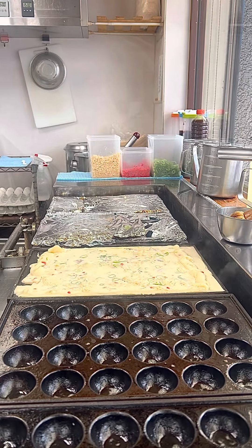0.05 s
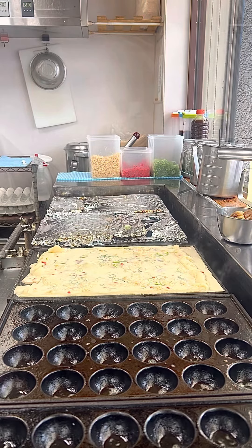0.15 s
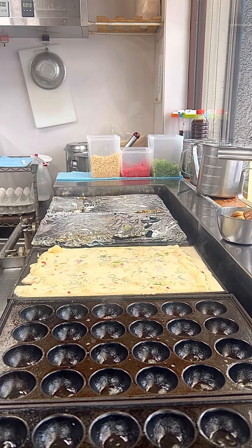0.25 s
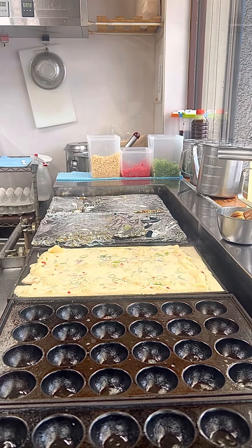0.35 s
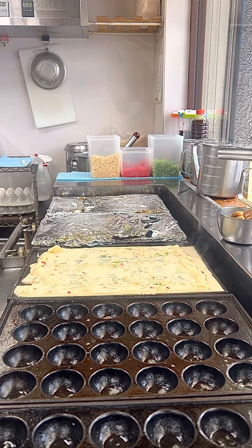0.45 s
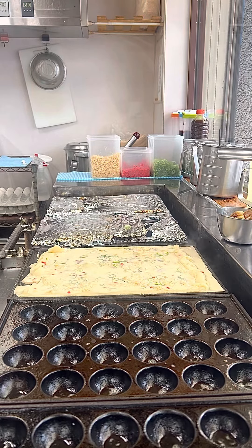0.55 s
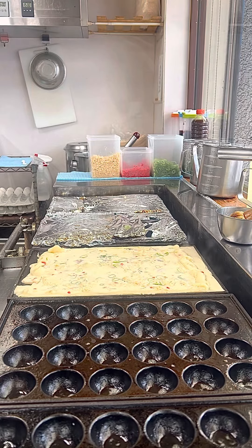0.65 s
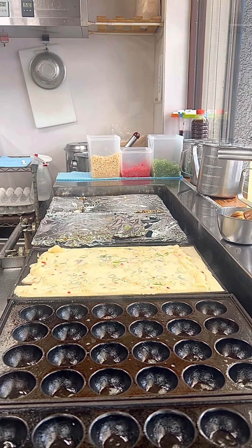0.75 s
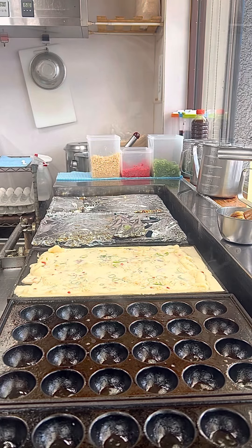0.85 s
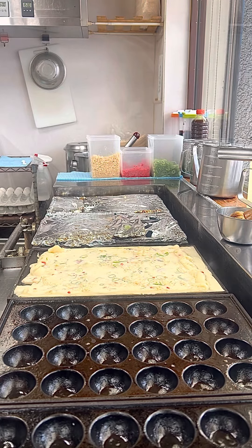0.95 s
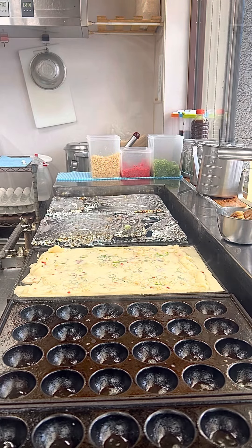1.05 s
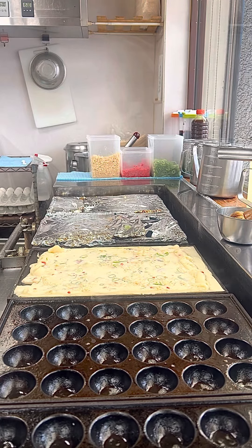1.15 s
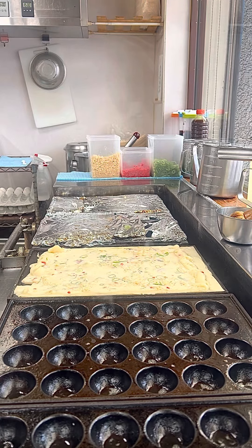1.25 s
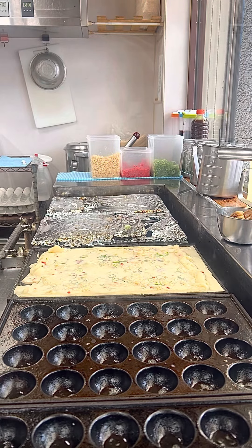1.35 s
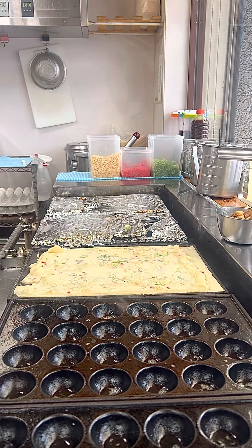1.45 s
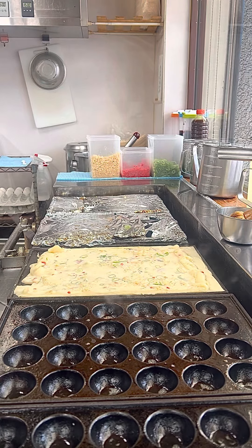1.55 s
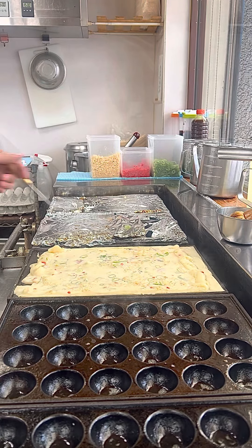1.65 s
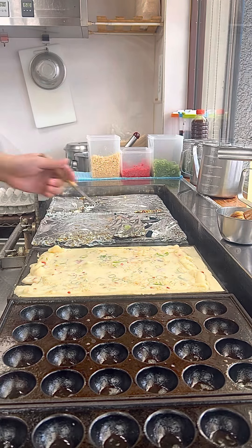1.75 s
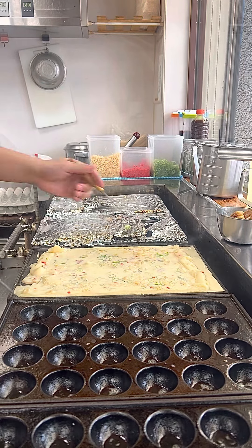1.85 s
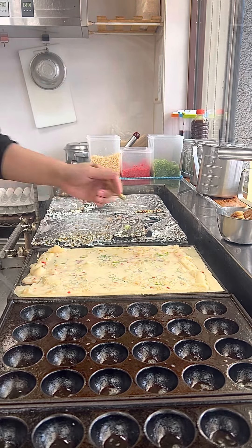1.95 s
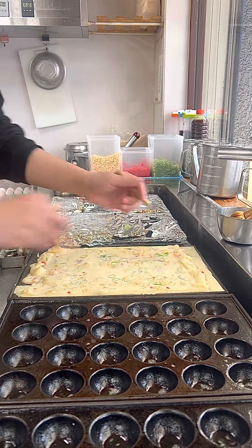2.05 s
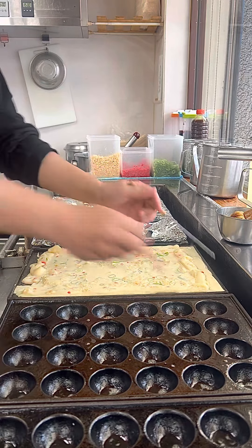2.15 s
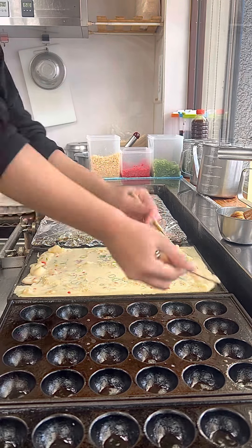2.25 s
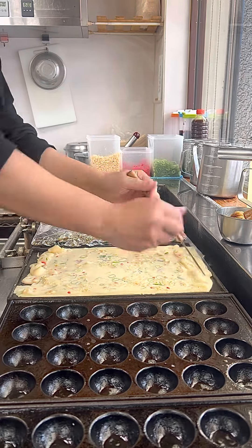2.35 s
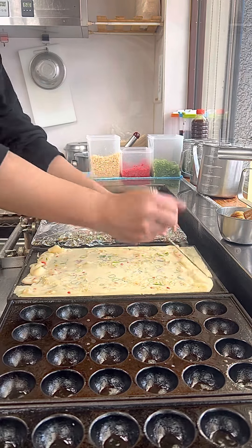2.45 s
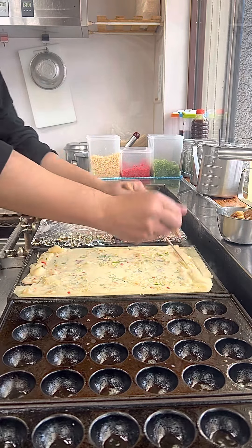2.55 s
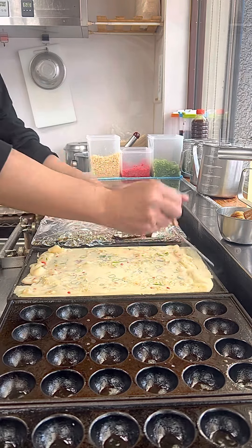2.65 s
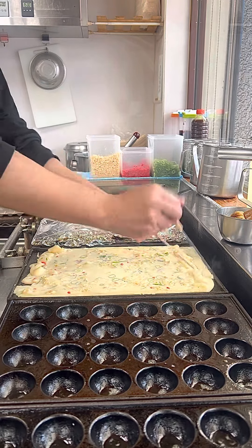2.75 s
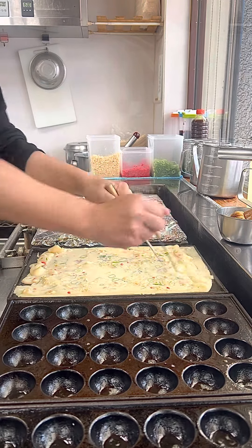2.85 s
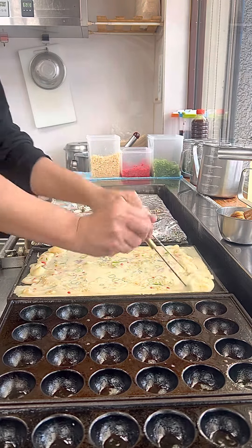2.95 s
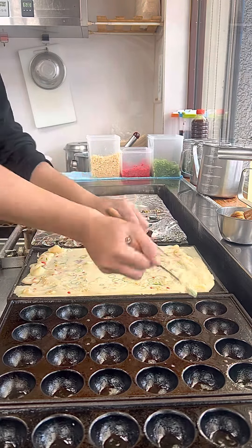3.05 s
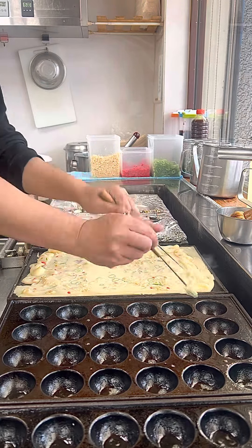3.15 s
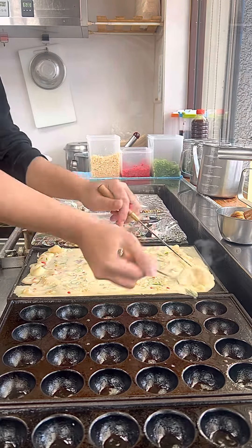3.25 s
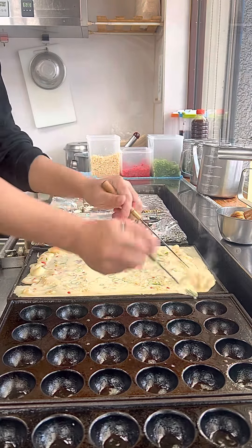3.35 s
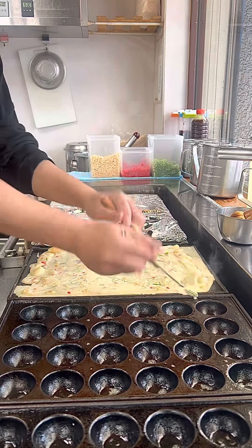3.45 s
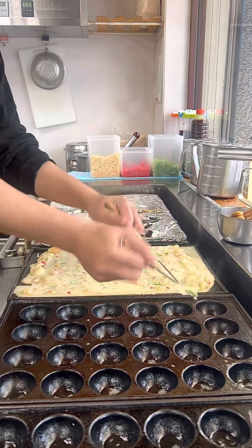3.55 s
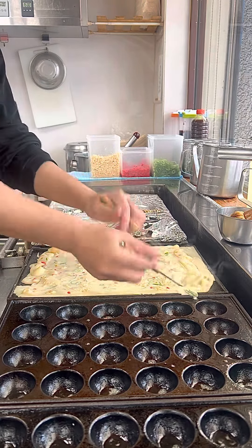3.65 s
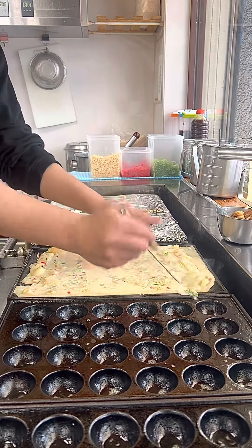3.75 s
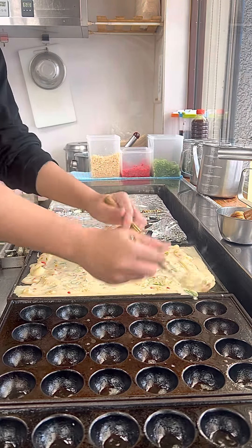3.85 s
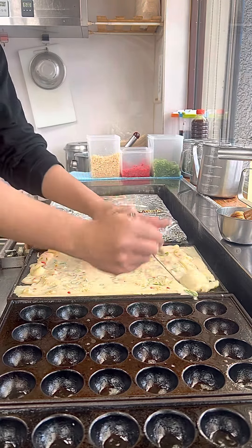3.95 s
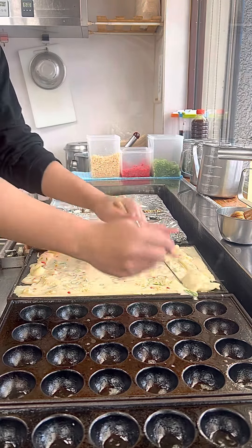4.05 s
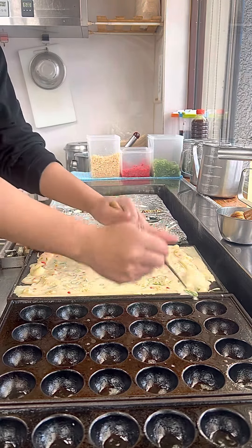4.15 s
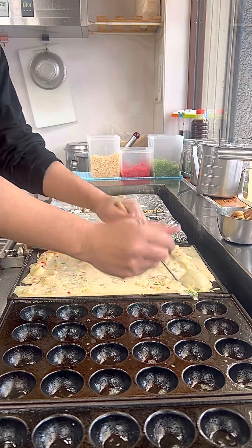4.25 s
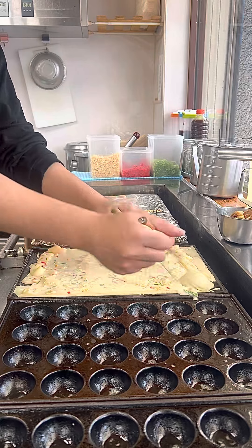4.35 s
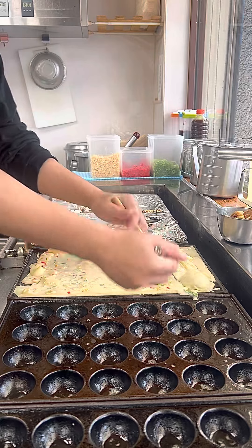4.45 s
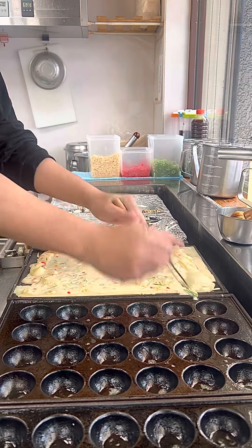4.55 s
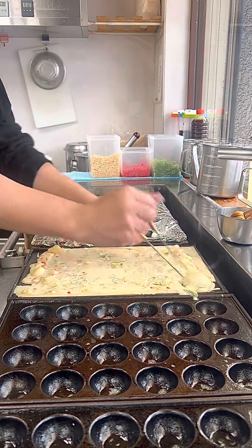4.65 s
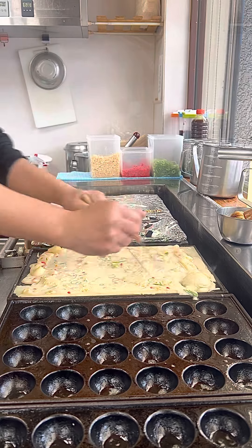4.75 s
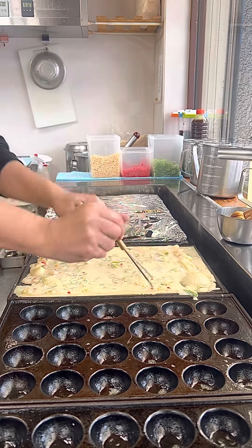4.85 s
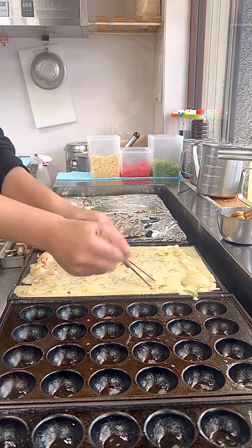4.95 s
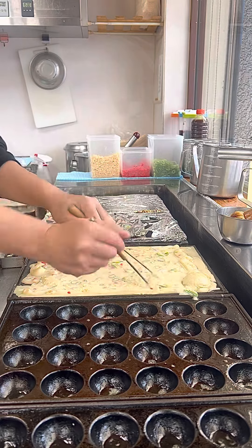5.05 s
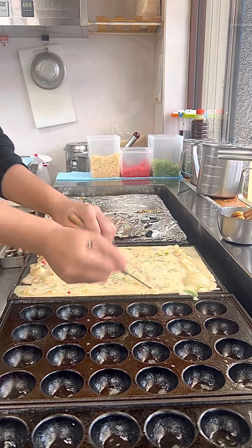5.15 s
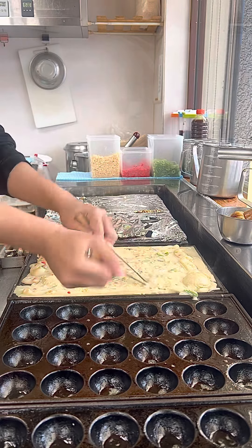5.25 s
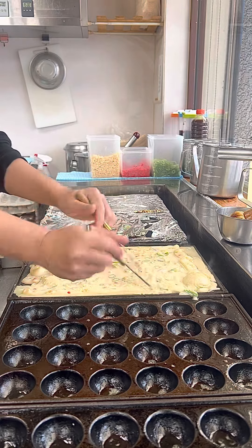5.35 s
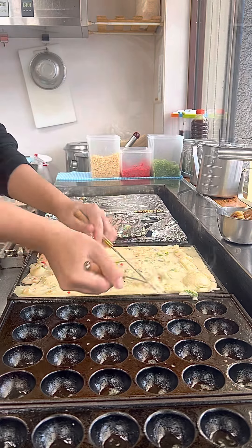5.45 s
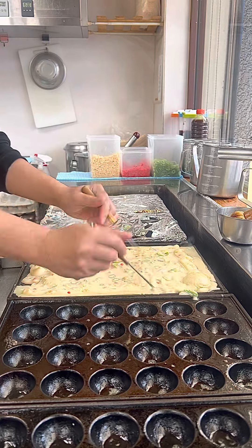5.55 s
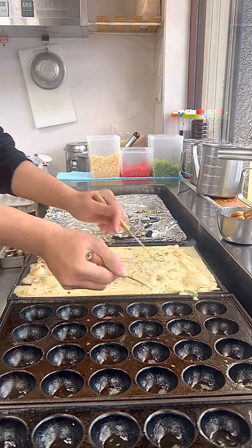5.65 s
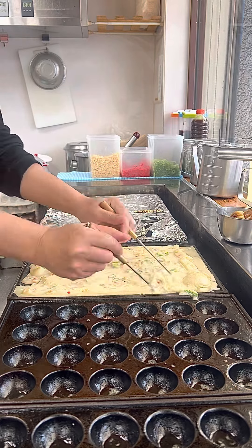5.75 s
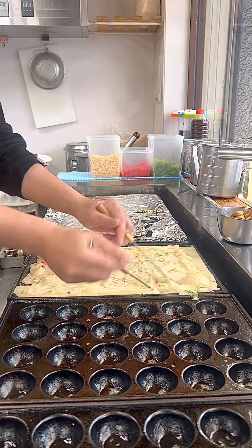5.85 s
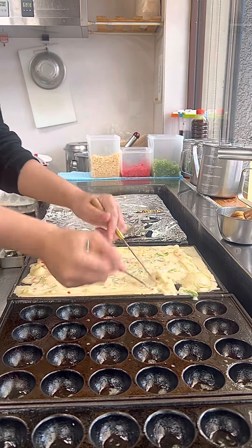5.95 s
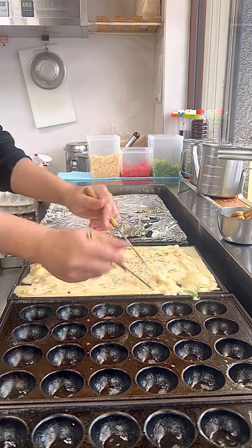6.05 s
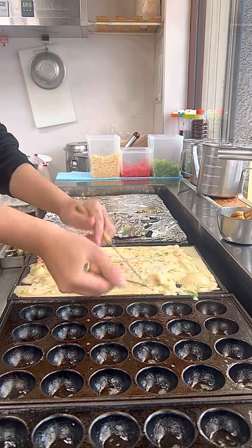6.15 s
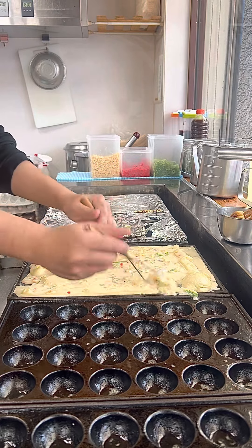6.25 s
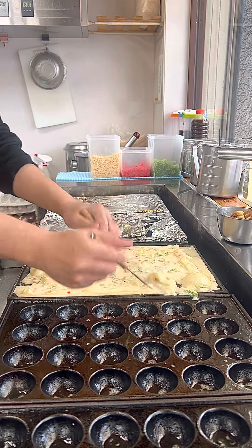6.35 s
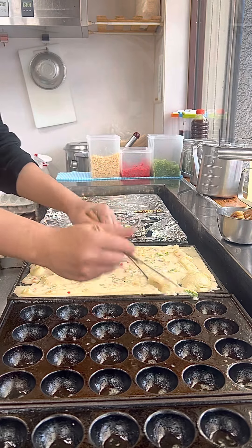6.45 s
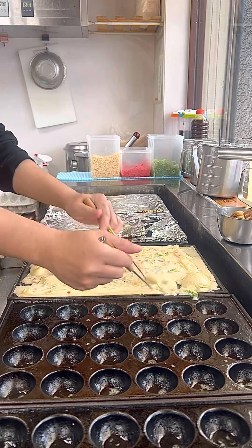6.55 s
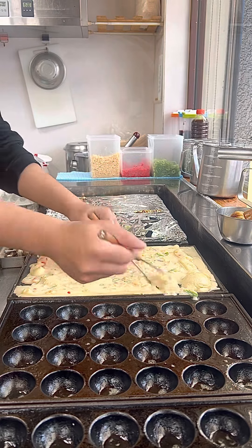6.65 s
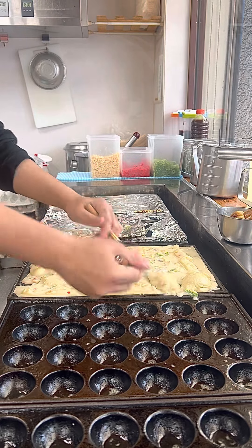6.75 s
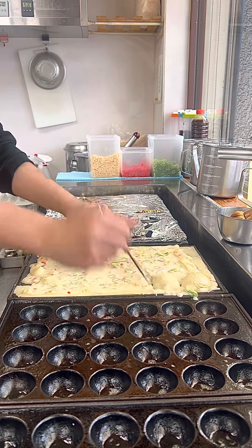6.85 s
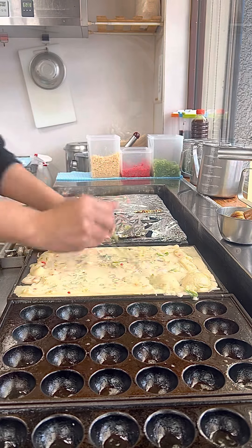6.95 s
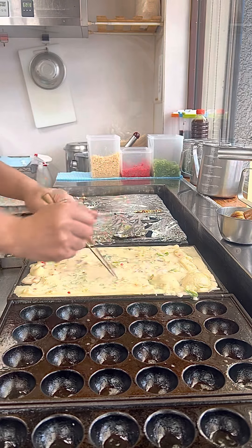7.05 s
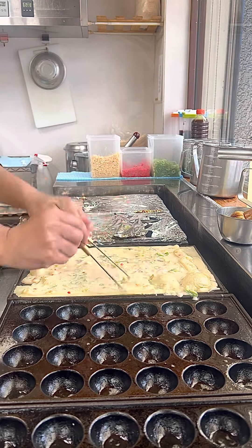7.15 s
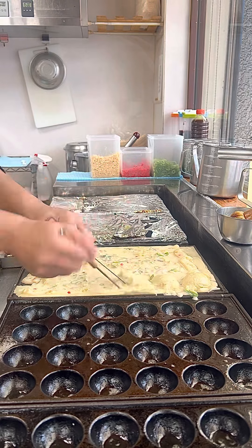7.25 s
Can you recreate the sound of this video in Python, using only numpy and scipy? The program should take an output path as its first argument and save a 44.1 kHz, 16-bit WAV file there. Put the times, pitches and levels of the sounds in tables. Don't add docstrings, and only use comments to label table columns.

```python
import sys
import numpy as np
from scipy import signal
from scipy.fft import rfft, irfft, next_fast_len
from scipy.io import wavfile
from scipy.ndimage import uniform_filter1d, map_coordinates

SR = 44100
rng = np.random.default_rng(int(sys.argv[2]) if len(sys.argv) > 2 else 0)


def master(y):
    cut = np.clip(np.atleast_2d(y).T, -1, 1)
    pcm = np.round(cut * 32767)
    wavfile.write(sys.argv[1], SR, pcm.astype(np.int16))


def level_to_linear(level):
    exponent = np.asarray(level, float) / 20
    return 10 ** exponent


N = 321930


def unit(x):
    return x / np.sqrt(np.mean(x ** 2) + 1e-20)


def along(points, hz):
    f, v = np.transpose(points)
    return np.interp(np.log(hz + 1), np.log(f + 1), v)


def curves(rows):
    s, *cols = np.transpose(rows)
    return [np.interp(np.arange(N) / SR, s, c) for c in cols]


def filtered(x, response):
    n = x.shape[-1]
    m = next_fast_len(n + 4096)
    return irfft(rfft(x, m) * response(np.fft.rfftfreq(m, 1 / SR)), m)[..., :n]


def modes(table, f):
    return sum((-1) ** k * level_to_linear(db) * 1j * f * w / (c * c - f * f + 1j * f * w)
               for k, (c, w, db) in enumerate(table))


def noise(patchy_db):
    z = signal.stft(rng.standard_normal((2, N)), nperseg=512)[2]
    field = uniform_filter1d(rng.standard_normal(z.shape[1:]), size=8, axis=0)
    field = uniform_filter1d(field, size=10, axis=1)
    return signal.istft(z * level_to_linear(patchy_db * unit(field)), nperseg=512)[1][:, :N]


def grains(count, spread_db):
    at = rng.integers(0, N, count)
    size = level_to_linear(spread_db * np.minimum(rng.exponential(size=count), 4.5))
    return np.array([np.bincount(at, size * rng.standard_normal(count), N) for _ in range(2)])


def add(track, s, piece):
    i = round(s * SR)
    track[:, i:i + piece.shape[1]] += piece[:, :max(N - i, 0)]


def swells(rows):
    t = np.arange(0, N / SR + .002, .002)
    s, db, rise, fall = np.transpose(rows)[:, :, None]
    before, after = (s - t) / np.maximum(rise, .005), (t - s) / np.maximum(fall, .005)
    far = np.where(t < s, before, after)
    gain = level_to_linear(db - 20 * far ** 1.5).sum(axis=0)
    return np.interp(np.arange(N) / SR, t, gain)


def draught_db():
    # (time [s], strength [dB])
    strength = [(0.0, -50.5), (0.75, -49.5), (1.93, -49), (2.09, -48), (3.64, -44.5), (3.82, -41.5),
                (4.49, -45.5), (5.96, -39.5), (6.24, -40), (7.3, -37)]
    return curves(strength)[0] + 46


def drone():
    # (time [s], pitch [Hz], level [dB])
    note_path = [(0.0, 50.8, -54), (0.12, 49.4, -27), (0.28, 45.5, -33.5), (0.57, 58.47, -35.5),
                 (1.67, 56.9, -30), (1.81, 70.4, -33), (2.05, 67.5, -28), (2.32, 45.9, -21.5),
                 (2.82, 49.65, -14), (2.88, 46.46, -16.5), (3.66, 46.7, -21.5), (3.84, 48.7, -16.5),
                 (5.35, 45.92, -15), (5.57, 59.78, -15.5), (6.49, 61.9, -15.5), (6.65, 56.83, -19.5),
                 (7.14, 56.47, -19.5), (7.3, 44.74, -12)]
    # (time [s], depth [dB])
    dips = [(1.93, 16), (2.17, 32), (2.42, 10), (2.514, 3), (2.614, 11), (2.873, 1), (3.133, 16),
            (3.302, 18), (3.427, 16), (3.512, 1), (3.577, 14), (3.682, 14), (3.971, 18), (4.26, 14.5),
            (4.37, 6), (4.48, 4.5), (4.545, 6), (4.634, 4), (4.719, 9), (4.839, 9), (4.944, -1),
            (5.138, 11), (5.298, 8), (5.422, 25), (5.677, 9), (5.752, 11), (5.956, 11), (6.366, 7),
            (6.54, 6.5), (6.595, 11), (6.685, 17), (6.824, 17), (6.964, 30), (7.094, 17)]
    dip_s = .024
    hz, db = curves(note_path)
    t = np.arange(N) / SR
    db = db + 1.5 - sum(depth_db * np.exp(-((t - s) / dip_s) ** 2) for s, depth_db in dips)
    note = np.sqrt(2) * np.sin(2 * np.pi * np.cumsum(hz) / SR)
    blur = unit(filtered(rng.standard_normal(N), lambda f: modes([(50.3, 32, 0)], f) ** 3))
    return level_to_linear(db) * (0.8 * note + 0.24 * blur) * [[1], [0]]


def roar():
    # (frequency [Hz], density [dB per Hz])
    flame = [(33, -33), (42, -3), (70, 2.5), (130, -5.5), (250, -12.5), (500, -21), (690, -22),
             (790, -26.5), (900, -24.5), (1200, -31), (1800, -37.5), (2200, -47.5), (3500, -46.5),
             (6000, -120)]
    # (frequency [Hz], width [Hz], level [dB])
    shaken_modes = [(150, 1.4, -10.5), (212.6, 6.4, -12), (295.4, 4.9, -8), (330.8, 6.1, -7),
                    (489, 6.7, -13.5), (616, 70, -26), (970, 7.5, -25)]
    # (level at the mean draught [dB], growth [dB per dB of draught])
    regions = [
        (-29, 0.71),
        (-37.5, 1),
        (-44, 0.94),
    ]
    # (time [s], strength [dB], rise [s], fall [s])
    shakes = [(1.83, -20, 0.044, 0.083), (2.01, -22, 0.049, 0.042), (2.24, -28.5, 0.048, 0.11),
              (2.52, -29.5, 0.086, 0.15), (2.75, -27, 0.24, 0.33), (3.92, -33, 0.29, 1),
              (4.78, -25.5, 0.13, 0.023), (4.95, -35, 0.03, 0.17), (6.2, -43, 0.14, 0.62),
              (7.2, -35, 0.022, 0.32)]
    both = filtered(noise(patchy_db=1.0),
                    lambda f: level_to_linear(along(flame, f)) + level_to_linear(3.5) * np.abs(modes(shaken_modes, f)))
    low = lambda f, edge_hz: 1 / (1 + (f / edge_hz) ** 6)
    parts = [lambda f: low(f, 272), lambda f: low(f, 844) - low(f, 305), lambda f: 1 - low(f, 798)]
    shake, strength_db = swells(shakes), draught_db()
    extra = [shake, level_to_linear(-15.5) * shake, 0]
    return sum((level_to_linear(db + grows * strength_db) + more) * unit(filtered(both, part))
               for (db, grows), more, part in zip(regions, extra, parts))


def counter():
    # (time [s], peak [dB], rise [s], fall [s])
    sing_high = [(.52, -40, 0.21, 0.3), (2.24, -29.5, 0.091, 0.15), (2.8, -25.5, 0.44, 0.14),
                 (4.0, -41.5, 0.095, 0.93), (4.55, -28, 0.22, 0.064), (6.199, -29, 0.097, 0.19),
                 (6.999, -28.5, 0.69, 0.21)]
    # (time [s], peak [dB], rise [s], fall [s])
    sing_low = [(1.299, -38, 0.41, 0.67), (1.85, -44, 0.057, .3), (3.3, -29, 0.84, 0.53),
                (4.0, -47.5, 0.64, 1), (4.92, -21.5, 0.48, 0.14), (7.18, -20, 0.29, 0.12)]
    rest_db = -40.5, -37.5

    def ring(hz, width):
        return unit(filtered(rng.standard_normal((2, N)), lambda f: modes([(hz, width, 0)], f) ** 2))

    high, low = (level_to_linear(db + 0.64 * draught_db()) + swells(rows)
                 for db, rows in zip(rest_db, (sing_high, sing_low)))
    return high * ring(206.6, 12.7) + low * ring(95.66, 5.4)


def hood():
    # (frequency [Hz], width [Hz], level [dB])
    whistles = [(2377, 110, 1), (3240, 150, 7), (4870, 160, -15)]
    air = rng.standard_normal((2, N))
    return level_to_linear(-56.0) * unit(filtered(air, lambda f: np.abs(modes(whistles, f)) ** 1.44))


def sizzle():
    # (time [s], level [dB])
    heat = [(0.0, -49), (0.69, -51), (1.81, -49), (2.15, -33.5), (2.27, -44.5), (2.5, -47), (2.68, -47),
            (3.05, -45.5), (4.21, -41.5), (4.55, -45), (4.86, -44.5), (5.02, -41.5), (6.28, -36.5),
            (7.3, -36)]
    # (frequency [Hz], density [dB per Hz])
    fizz = [(1200, -49), (2000, -19.5), (2500, 0), (3300, -1.5), (4000, 1.5), (4800, 3), (6200, -1.5),
            (8300, -3), (12000, 3.5), (16000, -4)]
    # (frequency [Hz], width [Hz], level [dB])
    whistle_peak = [(5100, 130, -1.5)]
    spray = unit(noise(patchy_db=2.2)) + .3 * unit(grains(count=9000, spread_db=3))
    spit_db, spit_t60 = -14, 0.044
    fade = level_to_linear(-60 * np.arange(SR // 20) / SR / spit_t60)
    puffs = signal.fftconvolve(np.abs(grains(count=260, spread_db=1)[0]), fade)[:N]
    spray = spray + level_to_linear(spit_db) * unit(puffs * rng.standard_normal((2, N)))
    colour = lambda f: level_to_linear(along(fizz, f)) * (1 + np.abs(modes(whistle_peak, f)))
    return level_to_linear(curves(heat)[0] + 0.4) * unit(filtered(spray, colour))


def squeals():
    # (time [s], length [s], pitch [Hz], glide [Hz], level [dB])
    slips = [(0.138, .06, 8400, 0, -53), (.28, .09, 546, 88, -37), (1.348, 0.028, 6920, 100, -29),
             (1.96, .1, 1715, -20, -50), (1.965, 0.11, 4300, 2, -48), (1.992, 0.101, 6250, -100, -39.5),
             (2.003, 0.082, 8400, 147, -35), (2.011, .13, 655, 8.5, -34), (2.017, .055, 3200, -2, -46.5),
             (2.049, .08, 1630, 0, -54), (2.079, 0.073, 7840, -300, -43), (2.085, .05, 9170, -500, -32),
             (2.137, .06, 1670, -30, -51), (2.177, .035, 8100, -100, -47), (2.18, .1, 1616, 40, -52),
             (2.234, 0.053, 8900, 2, -44), (2.238, .05, 7200, 0, -48), (2.242, 0.047, 4730, 102, -41),
             (2.442, 0.0793, 1620, 90, -51), (2.58, 0.077, 686, -30, -38), (2.57, .09, 1670, 20, -51),
             (2.708, 0.102, 1600, 133, -47), (2.758, 0.062, 700, -84, -34), (2.864, .035, 8750, 0, -44),
             (4.691, 0.072, 1704, 0, -49), (4.79, .035, 7150, 100, -38.5), (4.793, 0.032, 4240, 4, -41),
             (7.151, 0.11, 628, -36, -31.5)]
    blur = .045
    out, t = np.zeros((2, N)), np.arange(SR // 5) / SR
    for s, length, hz, glide_hz, db in slips:
        u = np.clip(t / max(length, .01), 0, 1)
        flicker = [map_coordinates(rng.standard_normal(200), [2 + t * blur * hz]) for _ in range(2)]
        tone = np.sin(2 * np.pi * np.cumsum(hz + glide_hz * u) / SR)
        tone = tone * np.sqrt(np.abs(np.sin(np.pi * u)))
        add(out, s, level_to_linear(db + 3.5) * tone * ([[.5], [0]] + np.array(flicker)) * (u < 1))
    return out


def iron(f):
    # (frequency [Hz], density [dB per Hz])
    rasp = [(1200, -49), (2000, -8.5), (3000, 2), (4800, -3), (6200, -4), (8300, -8), (12000, 11),
            (16000, -21.5)]
    # (frequency [Hz], width [Hz], level [dB])
    pan_modes = [(3200, 200, -28), (4060, 67, 4.5), (4990, 15, 4), (6060, 110, -10), (7050, 14, 5),
                 (8380, 37, -30), (7900, 650, 4), (8400, 150, -37)]
    return level_to_linear(along(rasp, f)) * (1 + 0.56 * np.abs(modes(pan_modes, f)))


def taps():
    # (time [s], peak [dB], ring of the spot [Hz], ring of the pick [Hz], dullness [dB])
    sharp_ticks = [(1.1264, -47, 3240, 7590, -11), (1.7182, -40, 3200, 7950, -11),
                   (1.869, -36, 3380, 7800, -6), (2.1849, -28.5, 4240, 8000, -5), (2.24, -31, 4740, 7240, -1),
                   (2.4767, -42, 3220, 8300, -3), (2.7209, -25.5, 4000, 8140, -11),
                   (3.8452, -18.5, 4760, 7500, -8.5), (4.049, -24.5, 3240, 8360, -12),
                   (4.0849, -22.5, 4500, 8800, -13.5), (4.143, -31, 3240, 8530, -16),
                   (5.3946, -26, 4760, 7200, -18), (5.424, -14.5, 4980, 8400, -12),
                   (5.5387, -26, 3470, 7290, -9), (5.6206, -30, 4770, 7600, -9),
                   (6.14, -19.5, 3630, 6400, -18), (6.1988, -33, 5050, 8350, -22),
                   (6.3809, -24.5, 2750, 7700, -14), (6.5931, -26.5, 4340, 6270, -14),
                   (6.7316, -30, 5010, 6970, -7), (6.7378, -23.5, 4770, 6930, -18),
                   (6.7979, -17.5, 3200, 8150, -14), (7.2842, -25.5, 4000, 8500, -17)]
    more_taps = [(2.6, -23.5, 5100, 8100, -11), (2.7167, -25, 2940, 8250, -13.5),
                 (3.0675, -28.5, 3280, 8040, -18), (3.462, -22.5, 4250, 8250, -11),
                 (3.4733, -30, 5100, 8400, -7), (4.5257, -19.5, 4150, 8700, -13),
                 (4.6999, -22, 5880, 8087, -9), (5.1986, -22, 4980, 8726, -24),
                 (6.3102, -22, 4955, 7665, -21), (6.6298, -23.5, 4500, 8250, -11),
                 (7.0846, -26, 5100, 8520, -8), (7.163, -29, 5240, 7900, -11)]
    skids = [(1.7806, -34, 3150, 6360, -3), (1.999, -27, 4280, 8900, -21),
             (2.456, -19.5, 3020, 8250, -14.5), (2.5737, -26, 4290, 6000, -8),
             (2.6955, -20.5, 3520, 6700, -17), (2.7563, -19.5, 2958, 8340, -11),
             (3.026, -29.5, 5100, 8003, -10), (3.701, -17.5, 6850, 9100, -10),
             (4.2439, -22, 3800, 8350, -11.5), (4.4878, -20, 4300, 8630, -15),
             (5.1772, -28, 3273, 7707, -10), (6.291, -24, 4050, 7050, -13), (6.4883, -24, 5042, 8380, -10),
             (6.9721, -20, 4600, 6323, -12.5), (6.98, -23.5, 3200, 6060, -9),
             (7.0134, -23.5, 5047, 5940, -7)]
    scuffs = [(0.1768, -27.5, 3220, 8440, -14), (1.973, -35, 3180, 7500, -16),
              (2.8255, -29, 3250, 7610, -12), (2.8657, -20, 2950, 8450, -6.5),
              (3.4403, -29.5, 5190, 7980, -11), (3.745, -40, 2633, 9240, -10),
              (4.2735, -20, 5240, 7750, -16), (4.3757, -28, 5370, 8950, -11), (4.6786, -24, 3116, 8150, -7),
              (4.7494, -21, 4930, 8040, -3), (4.8015, -22, 4206, 7050, -4), (4.88, -41, 2710, 5844, -14),
              (4.9018, -21, 2660, 7840, -13), (5.8551, -22, 2930, 7340, -13)]
    sharp_s, soft_s, crack_t60 = .0002, .004, .03
    # contacts, t60 [s], rise [s]
    kinds = [(sharp_ticks, 0.1, sharp_s), (more_taps, 0.094, sharp_s),
             (skids, 0.19, sharp_s), (scuffs, 0.17, soft_s)]
    contacts = [(*row, *how) for rows, *how in kinds for row in rows]
    out, t = np.zeros((2, N)), np.arange(SR // 5) / SR
    for s, db, low_hz, high_hz, dull_db, t60, rise in contacts:
        chatter = level_to_linear(2.2 * unit(uniform_filter1d(rng.standard_normal(len(t)), size=90)))
        rise = max(rise, soft_s * min((-25 - db) / 8, 1))
        shape = 2.15 * level_to_linear(-60 * t / crack_t60) + chatter * level_to_linear(-60 * t / t60)
        shape = shape * (1 - np.exp(-t / rise))
        pair = [(low_hz, 170, 8), (high_hz, 300, 8)]
        chance = [(hz, 220, 3) for hz in np.sort(rng.uniform(1320, 10700, size=7))]
        tilt = lambda f: level_to_linear((dull_db + 8.0) / (1 + (f / 5500) ** 6) - 6 / (1 + (f / 3200) ** 6))
        rings = lambda f: .6 + np.abs(modes(pair, f)) + np.abs(modes(chance, f))
        hiss = rng.standard_normal((2, len(t)))
        burst = shape * unit(filtered(hiss, lambda f: iron(f) * tilt(f) * rings(f)))
        add(out, s, level_to_linear(db - 11.0) * burst)
    return out


def knocks():
    # (time [s], peak [dB], pitch [Hz], t60 [s])
    blows = [(.31, -29.5, 616, 0.22), (1.789, -16.5, 140, 0.19), (1.796, -18, 550, 0.11),
             (1.9, -25, 495, 1), (2.02, -27, 664, 0.64), (2.205, -11, 202.9, 0.81),
             (2.449, -18, 326.6, 0.94), (2.736, -9, 131.6, 0.72), (2.585, -26, 626, 0.23),
             (2.785, -21, 625, 0.14), (2.826, -15, 150, 0.14), (3.682, -16, 332, 0.35),
             (3.85, -20, 603, 0.14), (3.99, -16, 294.5, 0.98), (4.55, -10.5, 150, .3),
             (4.7, -15.5, 658, 0.13), (4.746, -6.5, 204, 0.1), (4.909, -7, 340, 0.14)]
    out, t = np.zeros((2, N)), np.arange(SR // 3) / SR
    partials = [(1, 1), (0.48, 0.39), (0.12, 2.7)]
    for s, db, hz, t60 in blows:
        note = sum(size * np.sin(2 * np.pi * ratio * hz * t) for size, ratio in partials)
        fade = level_to_linear(db - 8.5 - 60 * t / max(t60, .03)) * (1 - np.exp(-t / 0.0019))
        add(out, s, fade * note * [[1], [.9]])
    return out


def clink():
    # (time [s], peak [dB])
    strikes = [
        (1.344, -5),
        (1.3596, -6),
        (1.3647, -40),
    ]
    # (frequency [Hz], width [Hz], level [dB], t60 [s])
    tool_rings = [(2500, 120, -6.5, 0.085), (3470, 85, -4, 0.05), (3860, 290, 4.5, 0.075),
                  (4852, 130, 1, 0.14), (5180, 170, -5.5, 0.26), (6160, 350, -5, 0.092),
                  (7080, 60, -7, 0.064), (6930, 160, 0.5, 0.066), (7800, 670, -1, 0.09),
                  (8350, 870, 4.5, 0.031), (9120, 1600, 6.5, 0.087)]
    out, t = np.zeros((2, N)), np.arange(SR // 3) / SR
    dull = lambda f: iron(f) / (1 + (f / 12500) ** 4) / (1 + (3400 / (f + 1)) ** 6)
    for s, db in strikes:
        hiss = rng.standard_normal((2, len(t)))
        ring = 0
        for hz, width, level, t60 in tool_rings:
            tone = unit(filtered(hiss, lambda f: modes([(hz, width, 0)], f) ** 2))
            ring = ring + level_to_linear(level - 60 * t / t60) * tone
        splash = 4 * level_to_linear(-60 * t / 0.006) + 0.7 * level_to_linear(-60 * t / 0.23)
        clatter = splash * unit(filtered(rng.standard_normal((2, len(t))), dull))
        add(out, s, level_to_linear(db - 20.5) * (ring + clatter))
    return out


def drag():
    # (time [s], peak [dB], rise [s], fall [s])
    slides = [(2.05, -25.5, 0.08, 0.13), (2.11, -24.5, 0.068, 0.09), (2.19, -35, 0.045, 0.061),
              (2.25, -29.5, 0.027, 0.061), (2.87, -37, 0.12, 0.08), (3.27, -39.5, 0.18, 0.071),
              (3.48, -27.5, 0.028, 0.023), (4.7, -36, 0.034, 0.56), (5.88, -38, 0.096, 0.25),
              (6.98, -38, 0.017, 0.78)]
    # (frequency [Hz], width [Hz], level [dB])
    shafts = [(3250, 150, -9.5), (4300, 240, -3), (6040, 290, 4.5), (7150, 210, 6), (8260, 300, 7)]
    # (time [s], peak [dB], rise [s], fall [s])
    presses = [(2.0, -54, 0.1, 0.14), (2.12, -48, 0.27, 0.3), (2.46, -46, 0.0082, 0.1),
               (2.6, -48.5, 0.016, 0.068), (2.79, -52.5, 0.053, 0.042), (4.49, -53.5, 0.028, 0.068),
               (4.7, -54, 0.0093, 0.18)]
    # (frequency [Hz], width [Hz], level [dB])
    body = [(334.7, 11, 15.5), (495, 26, 14), (666, 57, 12.5), (1600, 87, 0), (1690, 66, -1)]
    clumps = level_to_linear(2.0 * unit(uniform_filter1d(rng.standard_normal(N), size=400)))
    catches = unit(noise(patchy_db=2)) + 0.35 * unit(grains(count=12000, spread_db=2.0))
    light = lambda f: level_to_linear(-9 / (1 + (f / 5000) ** 4) + 0.79 / (1 + (11500 / (f + 1)) ** 12))
    thin = lambda f: iron(f) * (1 + np.abs(modes(shafts, f))) * light(f)
    scrape = swells(slides) * unit(clumps * filtered(catches, thin))
    hum = filtered(rng.standard_normal((2, N)), lambda f: np.abs(modes(body, f)) ** 1.76)
    return scrape + level_to_linear(17.5) * swells(presses) * unit(hum)


def room(x):
    # (frequency [Hz], t60 [s])
    decay = [(500, 0.16), (4000, 0.33), (10000, 0.24)]
    hz, t, z = signal.stft(rng.standard_normal((2, SR // 2)), SR, nperseg=256)
    tail = signal.istft(z * level_to_linear(-60 * t / along(decay, hz)[:, None]), SR, nperseg=256)[1]
    late = np.pad(x, ((0, 0), (200, 0)))
    return signal.fftconvolve(late, tail / np.linalg.norm(tail[0]), axes=1)[:, :N]


def ports(pair):
    # (frequency [Hz], likeness [0-1])
    alike = [(60, .995), (170, .88), (430, .82), (650, .64), (1000, .38), (2000, .42), (4700, .6),
             (5700, .4), (6250, .98), (7500, .97), (8300, .92), (9800, .7), (11300, .9), (12100, .88),
             (12900, .96), (15500, .86)]
    # (frequency [Hz], lead [rad])
    lead = [(350, 0), (520, -.9), (700, -2.5), (820, -3.4), (1120, -4.5), (1600, -5.6), (2200, -5.1),
            (3200, -5.3), (4800, -4.3), (6300, -6.28), (7400, -6.1), (9500, -5), (10800, -3.3),
            (12500, -3.14)]
    # (frequency [Hz], level [dB])
    left = [(60, .4), (100, 1.5), (190, 4.5), (300, 2), (450, 1.5), (630, 4), (1000, 0), (16000, 0)]
    # (frequency [Hz], level [dB])
    port_colour = [(2000, 0), (7000, 0), (8600, 2), (9500, -3), (10200, -11.5), (10900, -13), (11500, -12),
                   (12300, -7), (13500, -6), (14600, -6), (15800, -7), (16500, -12), (17000, -60)]
    turn = lambda f: np.arccos(np.clip(along(alike, f), 0, 1)) / 2
    split = lambda f: level_to_linear(along(port_colour, f)) * [np.cos(turn(f)), np.sin(turn(f))]
    same, other = filtered(pair, split)

    def sides(f):
        half_db = along(left, f) / 2
        return np.array([level_to_linear(half_db), level_to_linear(-half_db) * np.exp(1j * along(lead, f))])

    return filtered(np.array([same + other, same - other]), sides)


def thin_treble(x, under_db, line_db, from_hz):
    # (time [s], length [s], gain [dB], top [Hz])
    openings = [(0, .003, 3, 16600), (.174, .008, 0, 12500), (1.126, .004, 3, 16000),
                (1.343, .004, -6, 12500), (1.716, .005, 3, 16000), (1.98, .03, -3, 13300),
                (2.455, .006, -3, 12800), (2.472, .026, -2, 16000), (2.573, .012, 0, 13000),
                (2.59, .024, -2, 16000), (2.694, .036, -1, 16000), (2.745, .031, -1, 16000),
                (3.44, .02, -3, 15000), (3.46, .038, 2, 16500), (3.699, .009, 6, 16600),
                (3.844, .004, -6, 16500), (4.045, .007, 1, 16600), (4.083, .006, 1, 16600),
                (4.243, .012, -3, 11800), (4.486, .004, -1, 16600), (4.675, .05, -3, 12900),
                (4.786, .034, 1, 16000), (5.185, .035, 4, 12000), (5.421, .01, 6, 16600),
                (6.137, .007, 5, 16600), (6.34, .055, -3, 12000), (6.575, .034, -2, 15500),
                (6.715, .034, 0, 16000), (6.785, .034, 0, 15500)]
    pair = np.array([x[0] + x[1], x[0] - x[1]]) / 2
    hz, _, z = signal.stft(pair, SR, nperseg=2048)
    band = np.arange(len(hz)) // 20
    line_power = np.abs(z) ** 2
    power = np.add.reduceat(line_power, np.arange(0, len(hz), 20), axis=1) / 20
    treble = power[:, band[hz > from_hz][0]:].mean(axis=(0, 1)) + 1e-20
    wander_db = 6 * unit(uniform_filter1d(rng.standard_normal(power.shape), size=2))
    tilt_db = np.interp(np.arange(power.shape[1]), [23, 24, 26, 27, 29, 30], [-2, -6, -3, 5, 4, 14])
    strong_band = power > treble * level_to_linear(2 * under_db + wander_db + tilt_db[:, None])
    strong = strong_band[:, band] & (line_power > treble * level_to_linear(2 * line_db))
    kept = z * (strong | (hz < from_hz)[:, None])
    lean = signal.istft(kept, SR, nperseg=2048)[1][:, :N]
    lost, found = pair - lean, np.zeros((2, N))
    for s, length, db, top_hz in openings:
        piece = lost[:, round(s * SR):][:, :round(length * SR)]
        top = lambda f: (f > 10300) * level_to_linear(7 * (f > 14300)) / (1 + (f / top_hz) ** 60)
        fade = signal.windows.tukey(piece.shape[1], .3)
        add(found, s, level_to_linear(db) * fade * filtered(piece, top))
    mid, side = lean + found
    return np.array([mid + side, mid - side])


def scene():
    picks, tool = taps(), clink()
    metal = picks + tool + level_to_linear(-3.0) * room(picks + .5 * tool) + drag() + squeals()
    stove = drone() + roar() + counter() + hood() + sizzle() + knocks()
    return ports(metal + stove)


def top_cut(x):
    return signal.sosfilt(signal.butter(12, 16510, fs=SR, output="sos"), x)


def record(dry):
    lean = thin_treble(dry, under_db=-7, line_db=-7.5, from_hz=5700)
    return top_cut(lean)


dry = scene()
out = record(dry)
master(out)
```